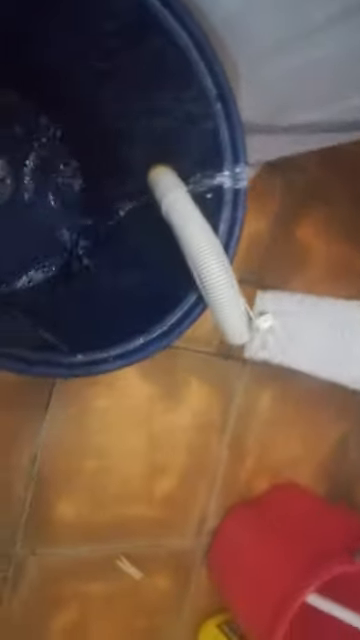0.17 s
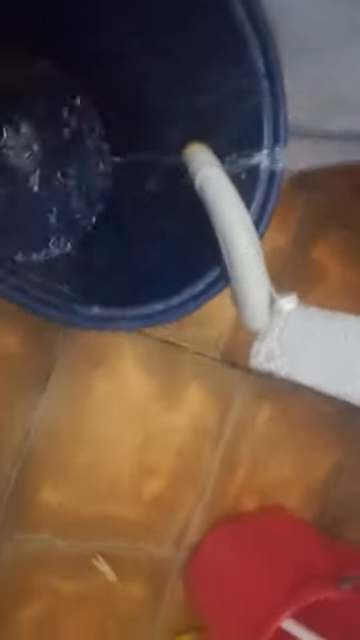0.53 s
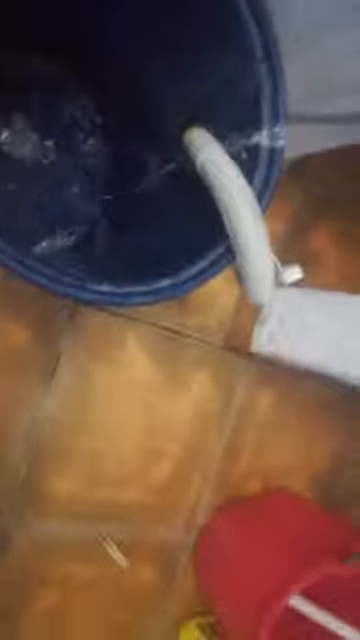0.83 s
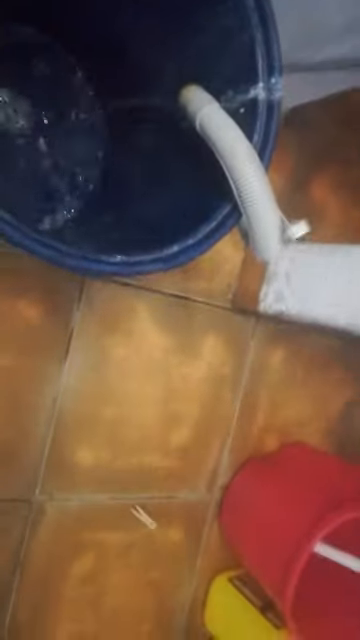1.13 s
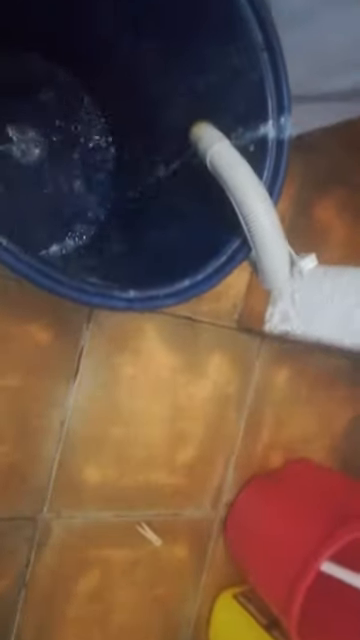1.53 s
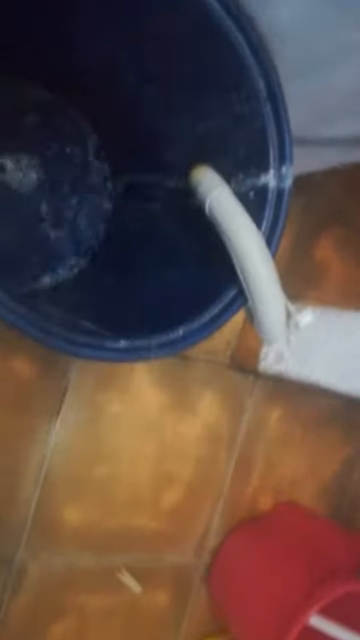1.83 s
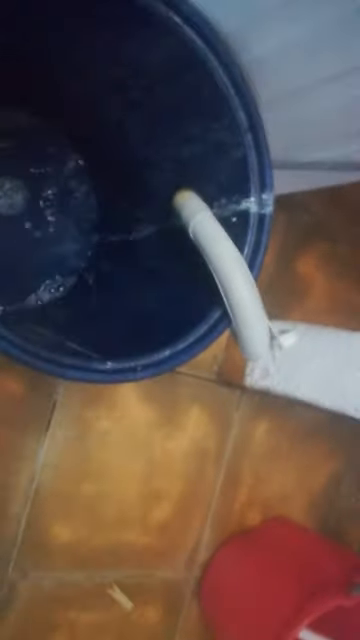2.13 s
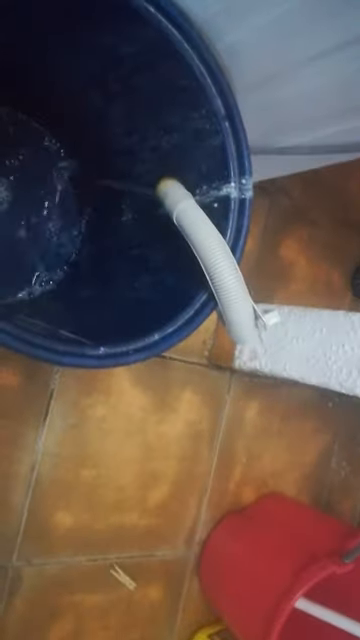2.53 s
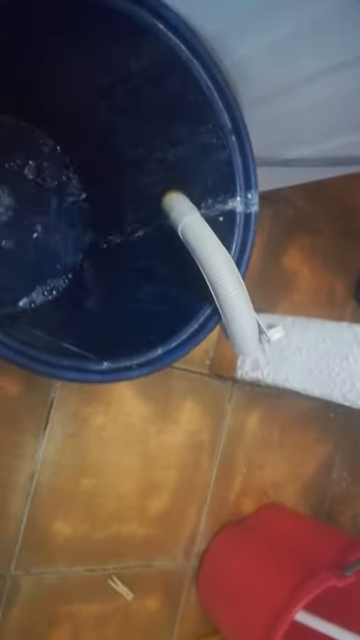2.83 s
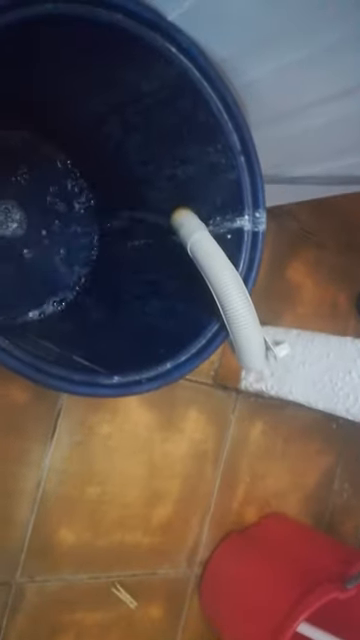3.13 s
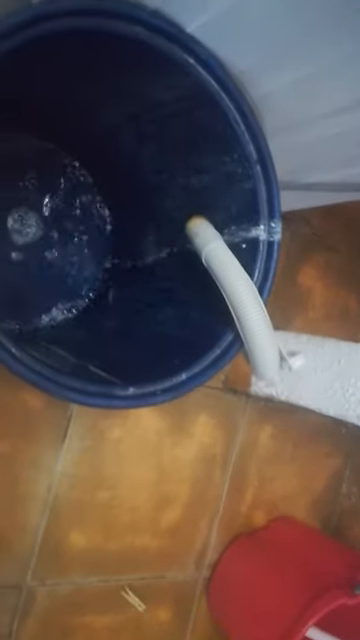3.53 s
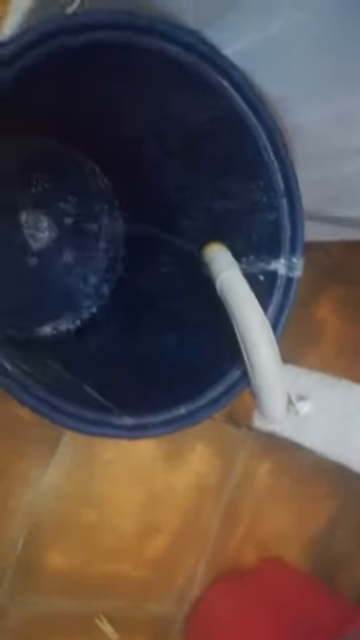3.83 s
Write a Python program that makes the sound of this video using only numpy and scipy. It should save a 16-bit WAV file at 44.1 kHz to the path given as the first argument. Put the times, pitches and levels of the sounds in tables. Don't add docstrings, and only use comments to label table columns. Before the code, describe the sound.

Water spurts from a washing machine hose into a plastic barrel about every two thirds of a second, bubbling and plopping, while a low pump hum swells with each gulp; close phone microphone, tiled room.

```python
import sys
import numpy as np
from scipy import signal
from scipy.fft import rfft, irfft
from scipy.io import wavfile

SR = 44100
rng = np.random.default_rng(int(sys.argv[2]) if len(sys.argv) > 2 else 0)


def generate_wav(signal):
    frames = np.transpose(np.atleast_2d(signal))
    scaled = np.clip(frames, -1, 1) * 32767
    pcm = np.round(scaled).astype(np.int16)
    wavfile.write(sys.argv[1], SR, pcm)


def how_loud(loudness_db):
    steps = np.asarray(loudness_db, float) / 20
    return 10 ** steps


N = 175959
T = np.arange(N) / SR


def in_time(rows):
    s, *columns = np.transpose(rows)
    return [np.interp(T, s, column) for column in columns]


def at_hz(points, hz):
    points_hz, values = np.transpose(points)
    return np.interp(np.log(hz + 1), np.log(points_hz), values)


def rms_one(x):
    return x / np.sqrt(np.mean(x ** 2) + 1e-20)


def bandpass(x, low_hz, high_hz, order=2):
    return signal.sosfilt(signal.butter(order, [low_hz, high_hz], "band", fs=SR, output="sos"), x)


def sine(hz):
    return np.sin(2 * np.pi * np.cumsum(np.broadcast_to(hz, N)) / SR)


def drift(rate_hz):
    every, settle = 40, 2000
    r = np.exp(-2 * np.pi * rate_hz * every / SR)
    noise = rng.standard_normal(N // every + settle + 2)
    slow = signal.lfilter([1], [1, -2 * r, r * r], noise)[settle:]
    return np.interp(np.arange(N) / every, np.arange(len(slow)), rms_one(slow))


def ring(clicks, hz, t60_s):
    r, w = how_loud(-60 / (t60_s * SR)), 2 * np.pi * hz / SR
    return signal.lfilter([0, np.sin(w)], [1, -2 * r * np.cos(w), r * r], clicks + 1e-18)


def banded(spectrum, patchy_db, swing_db=0, high_follows=1):
    edges = 22.6 * 2 ** np.arange(0, 9.6, .5)
    white = rng.standard_normal((2, N))
    together = drift(30)
    out, plain_power = 0, 0
    for k, (low, high) in enumerate(zip(edges, edges[1:])):
        hz = np.sqrt(low * high)
        if not spectrum[0][0] < hz < spectrum[-1][0]:
            continue
        band = how_loud(at_hz(spectrum, hz)) * bandpass(white[k % 2], low, high)
        plain_power += np.mean(band ** 2)
        follows = np.interp(np.log(hz), np.log([1000, 5000]), [1, high_follows])
        flicker_db = patchy_db * (.7 * together + drift(25))
        out = out + band * how_loud(follows * swing_db + flicker_db)
    return out / np.sqrt(plain_power)


# pitch_hz [Hz], level_db [dB per Hz]
HISS = [(290, -34), (500, -26), (659, -9), (1020, -13.5), (2890, -2.5), (14900, -18.5), (16000, -35)]


def microphone_hiss():
    near = banded(HISS, patchy_db=.4)
    far = how_loud(-6) * banded(HISS, patchy_db=.4)
    return how_loud(-65.5) * np.array([near, far])


def electronic_whine():
    whine = how_loud(-75 + 1.4 * drift(20)) * sine(14410)
    return np.array([whine, -how_loud(-5) * whine])


# start_s [s], stop_s [s], level_db [dB]
SPURTS = [
    (-.1, 0.192, -57),
    (0.607, 0.796, -56),
    (1.216, 1.481, -57.5),
    (1.956, 2.175, -55.5),
    (2.634, 2.836, -54.5),
    (3.25, 3.52, -56.5),
    (3.926, 4.193, -53.5),
]


def flow():
    dribble_db, lead_s, lead_db = -19.5, 0.16, -10.5
    land_s, fade_db, drain_s = 0.0087, -5.5, .1
    rows = []
    for start_s, stop_s, db in SPURTS:
        rows += [(start_s - lead_s, db + dribble_db),
                 (start_s - land_s, db + lead_db),
                 (start_s, db),
                 (stop_s, db + fade_db),
                 (stop_s + drain_s, db + dribble_db)]
    return in_time(rows)[0]


# pitch_hz [Hz], level_db [dB per Hz]
HOSE = [(350, 3.5), (480, -3), (610, -2.5), (850, -5.5), (2000, -13.5), (3500, -36)]


def hose_gurgle():
    return how_loud(-58.5 + 10.5 * load()[2]) * banded(HOSE, patchy_db=1.5)


def hose_mouth(excitation):
    return how_loud(-52) * ring(excitation, 820.6, t60_s=0.16)


# pitch_hz [Hz], level_db [dB per Hz]
SPLASH = [(500, -7), (900, -26), (1600, -30), (2700, 19), (4300, -6.5), (8000, -21), (16000, -48.5)]


def splash_rush(flow_db):
    swing_db = flow_db - flow_db.max()
    return how_loud(flow_db.max()) * banded(SPLASH, patchy_db=1.3, swing_db=swing_db, high_follows=0.57)


def grains(per_s, low_hz, high_hz, cycles, spread_db, vigour_db):
    sizes = how_loud(spread_db * np.minimum(rng.exponential(1, N), 3.5)) * rng.choice([-1, 1], N)
    born = rng.random(N) < per_s * how_loud(vigour_db / 2 + 4 * drift(25)) / SR
    pitches_hz = np.geomspace(low_hz, high_hz, num=16)
    dealt = rng.integers(0, 16, N)
    out = 0
    for k, hz in enumerate(pitches_hz):
        clicks = sizes * born * (dealt == k)
        softened = ring(ring(clicks, hz, cycles / hz), hz, 5 / hz)
        out = out + softened * hz ** 1.6
    return rms_one(out)


def bubble_cloud(swing_db):
    return how_loud(-46.5 + .8 * swing_db) * grains(1000, 750, 3500, 22, 4.3, swing_db)


def spray(swing_db):
    return how_loud(-67 + 0.9 * swing_db) * grains(1500, 3800, 10000, 8, 3.8, swing_db)


def drops(table, slap_db):
    gain_db, rise_per_s, swell_cycles = 10.5, 7, 3.0
    out, t = np.zeros(N + SR), np.arange(SR // 16) / SR
    for s, db, hz, cycles in table:
        swell = np.sin(np.minimum(t * hz / swell_cycles, 1) * np.pi / 2) ** 2
        tone = np.sin(2 * np.pi * hz * (t + rise_per_s * t * t / 2))
        bubble = tone * how_loud(-60 * t * hz / cycles) * swell
        burst = np.exp(-t / (.0012 + 2 / hz)) * np.minimum(t / (.0003 + 1 / hz), 1)
        slap = bandpass(rng.standard_normal(len(t)) * burst, hz / 1.8, min(hz * 1.6, 16500), order=4)
        slap = how_loud(slap_db) * slap / np.abs(slap).max()
        first = int(s * SR)
        out[first:first + len(t)] += how_loud(db + gain_db) * (bubble + slap)
    return out[:N]


# start_s [s], level_db
# [peak dB], pitch_hz [Hz]
GURGLES = [(0.564, -40, 814), (0.601, -40, 1670), (0.676, -32, 990), (0.753, -32, 1010), (0.92, -45, 1050),
           (1.23, -38, 1240), (1.256, -36, 790), (1.312, -34.5, 1140), (1.437, -54, 988),
           (1.776, -38.5, 1020), (1.863, -35, 781), (1.966, -33, 1440), (1.984, -47, 942),
           (2.054, -35, 1790), (2.113, -31, 980), (2.507, -41, 820), (2.7, -37, 1210), (2.713, -34, 795),
           (2.745, -30.5, 783), (2.932, -38.5, 1320), (3.125, -40, 977), (3.267, -49, 1460),
           (3.312, -30, 1400), (3.352, -36, 950), (3.377, -41, 820), (3.518, -38.5, 1410),
           (3.718, -33.5, 790), (3.866, -34.5, 1340),
           (0.5996, -39, 2350), (0.6405, -41, 2380), (0.7512, -33.5, 2290), (1.2057, -35.5, 2480),
         (1.3666, -35, 2450), (2.0754, -29, 2680), (2.641, -42, 3000), (2.6808, -55, 3430),
         (2.713, -40, 3600), (2.8038, -32, 2980), (2.8619, -39, 2380), (3.2533, -38, 2700),
         (3.3144, -32, 2950), (3.4443, -37, 2680), (3.5105, -35, 2680)]
# start_s [s], level_db [peak dB], pitch_hz [Hz]
FLECKS = [(0.023, -54, 5570), (0.0357, -42, 7500), (0.0957, -44, 6040), (0.188, -49, 7850),
          (0.5995, -52.5, 6300), (0.6473, -52, 8100), (0.661, -51, 5690), (0.6772, -42.5, 6170),
          (0.7332, -47, 6060), (1.174, -48.5, 5850), (1.2633, -36.5, 7800), (1.3877, -45, 5800),
          (1.4137, -55, 6020), (1.454, -48.5, 5550), (1.5062, -49.5, 5500), (1.9085, -53, 6960),
          (1.9843, -37, 5830), (2.06, -50, 5900), (2.11, -50, 7100), (2.5346, -46, 5630),
          (2.7464, -53, 5410), (2.7689, -43.5, 5670), (2.807, -54, 5560), (3.3124, -47, 8100),
          (3.3478, -50, 8140), (3.4353, -47.5, 6100), (3.463, -45, 6050), (3.7224, -47.5, 5150),
          (3.9519, -53, 6300), (3.97, -44.5, 6350)]


def small_drops():
    bubbles = [(s, db - 7, hz, 22.4) for s, db, hz in GURGLES]
    flecks = [(s, db - 9, hz, 20) for s, db, hz in FLECKS]
    return drops(bubbles, slap_db=-6.5) + drops(flecks, slap_db=3)


# start_s [s], level_db [peak dB], pitch_hz [Hz], decay_cycles [cycles]
GLUGS = [(0.096, -18.5, 1296, 2.4), (0.13, -36.5, 1050, 47), (0.257, -37.5, 696, 29),
         (0.678, -36, 475, 2.3), (0.807, -39, 760, 67), (1.389, -32.5, 487, 15), (1.703, -37, 750, 15),
         (2.11, -31, 492, 6), (2.146, -40, 760, 13), (2.159, -35.5, 823, 28), (2.698, -30, 475, 11),
         (2.745, -29.5, 475, 11), (3.691, -24, 940, 4.3), (3.971, -49, 1070, 13)]
# start_s [s], level_db [peak dB], pitch_hz [Hz], decay_cycles [cycles]
PLOPS = [(0.0641, -41, 2040, 54), (0.0807, -36.5, 2980, 40), (0.0978, -26, 2700, 22),
         (0.189, -34, 1610, 16.4), (0.3898, -42.5, 2680, 20), (0.643, -35.5, 1550, 24),
         (1.2141, -28, 2760, 6.7), (1.2968, -31, 2220, 6), (1.3552, -28, 1840, 9.5),
         (1.381, -30.5, 2424, 41), (1.484, -50, 1270, 5.7), (1.944, -29, 2280, 28), (2.087, -31, 2730, 32),
         (2.1714, -42, 2730, 65), (2.632, -29.5, 1140, 11), (2.76, -23, 2155, 18.5),
         (2.9118, -32.5, 1410, 11.5), (3.256, -29.5, 1460, 8.5), (3.3767, -32, 2880, 14),
         (3.4594, -30, 2700, 34), (3.9699, -40, 1080, 36)]
# start_s [s], level_db [peak dB], pitch_hz [Hz], decay_cycles [cycles]
DROPS = [(0.317, -45, 4700, 24), (0.6769, -30.5, 2760, 16), (0.7537, -36, 4780, 22),
         (0.7713, -43.5, 5900, 31), (1.0058, -36.5, 3700, 20), (1.1421, -45.5, 4480, 57),
         (1.2588, -33, 3830, 19), (1.485, -31, 4100, 7.2), (1.9597, -29.5, 3760, 16),
         (1.9848, -36.5, 5780, 17), (2.373, -40, 4470, 65), (3.053, -42.5, 4530, 8.5),
         (3.308, -46, 4230, 13), (3.9689, -39.5, 4640, 11)]
# start_s [s], level_db [peak dB], pitch_hz [Hz]
TICKS = [
    (0.0014, -41, 8950),
    (1.267, -48, 13900),
    (1.3133, -42.5, 8100),
    (1.548, -51.5, 11800),
    (1.983, -63, 8400),
    (2.5346, -38.5, 13200),
    (3.3064, -48, 8100),
    (3.865, -48, 8000),
]


def large_drops():
    ticks = [(s, db, hz, 26) for s, db, hz in TICKS]
    return drops(GLUGS + PLOPS + DROPS + ticks, slap_db=-12)


def barrel(x):
    t60_s, cut_hz = 0.23, 8800
    dull = np.exp(-2 * np.pi * cut_hz / SR)
    z = np.exp(-2j * np.pi * np.arange(N // 2 + 1) / N)
    lags_s = np.geomspace(.006, .023, num=8) * rng.uniform(.95, 1.05, size=8)
    echoes = 0
    for k, lag_s in enumerate(lags_s):
        loop = how_loud(-60 * lag_s / t60_s) * (1 - dull) / (1 - dull * z) * z ** np.round(lag_s * SR)
        echoes = echoes + (-1) ** k * loop / (1 - loop)
    return how_loud(-17.5) * irfft(rfft(x) * echoes, N)


def water():
    flow_db = flow()
    swing_db = flow_db - flow_db.max()
    stream = hose_gurgle() + splash_rush(flow_db)
    bubbles = bubble_cloud(swing_db)
    stream += hose_mouth(stream + bubbles)
    hits = bubbles + spray(swing_db) + large_drops() + small_drops()
    return stream + hits + barrel(hits)


def cabinet_bump():
    return how_loud(-28) * np.exp(-((T - 1.035) / .045) ** 2) * np.sin(2 * np.pi * 84 * T)


# pitch_hz [Hz], level_db [dB per Hz]
RUMBLE = [(15, -46), (25, -6), (48, -25), (81, -2.5), (145, -1.5), (169, -30), (194, -8.5), (257, -10.5),
          (700, -25.5), (910, -62), (1540, -120)]


def rumble(share):
    return how_loud(-49.5 + 5 * share) * banded(RUMBLE, patchy_db=0.36)


# harmonic [multiple of mains], level_db [dB], load_gain_db [dB], wobble_db [dB]
HUM = [
    (1, -52.5, 6, 3),
    (2, -46.5, 1, 5),
    (4, -56.5, 4.5, 7),
    (5, -57.5, 3.5, 4),
    (6, -51.5, -1, 1.5),
    (7, -62.5, 1, 4.5),
    (8, -64.5, -27, -10),
    (9, -69, 15.5, 1.5),
]
# start_s [s], level_db [dB]
PANEL_BUZZ = [
    (0, 2),
    (1.2, -0.5),
    (1.5, -13),
    (4, -4),
]


def motor_hum(share):
    mains_hz, dip_depth_db, dip_s, early_s = 50.2, -15, .075, .03
    dip_db = dip_depth_db * sum(np.exp(-((T - full + early_s) / dip_s) ** 2) for _, full, *_ in GULPS)
    panel_db = in_time(PANEL_BUZZ)[0]
    out = np.zeros(N)
    for k, db, load_db, wobble_db in HUM:
        level_db = db + load_db * share + min(wobble_db, .6 * k + .3) * drift(10)
        level_db += panel_db * (k == 6) + dip_db * (k == 1)
        phase = .08 * (k + 1) * drift(5) + rng.uniform(0, 7)
        out += np.sqrt(2) * how_loud(level_db) * np.sin(2 * np.pi * k * mains_hz * T + phase)
    return out


def priming_churn():
    centre_hz, width_hz, spread_s = 216.3, 50, 0.071
    noise = bandpass(rng.standard_normal(N), centre_hz - width_hz / 2, centre_hz + width_hz / 2)
    swell = sum(np.exp(-((T - full) / spread_s) ** 2) for _, full, *_ in GULPS)
    return how_loud(-43) * rms_one(noise) * swell


# dry_s [s], full_s [s], full_level_db [blade tone dB when fully loaded],
# last_level_db [blade tone dB before it runs dry again]
GULPS = [
    (-.45, -0.04, -35, -32),
    (0.241, 0.539, -32, -31.5),
    (0.893, 1.188, -33.5, -34.5),
    (1.564, 1.851, -31.5, -32.5),
    (2.244, 2.603, -34, -31),
    (2.904, 3.205, -31.5, -33),
    (3.584, 3.831, -32.5, -32),
    (4.3, 4.5, -31, -31),
]


def load():
    dry_db, primed_db, prime_s, lose_s = -19, -13.5, 0.0833, 0.0718
    stall_hz, surge_hz, sag_hz = -11, 2.348, -2.43
    rows = []
    for (dry_s, full_s, db, last_db), (end_s, *_) in zip(GULPS, GULPS[1:]):
        rows += [(dry_s, db + dry_db, stall_hz, 0),
                 (dry_s + prime_s, db + primed_db, 0, .1),
                 (full_s, db, surge_hz, 1),
                 (end_s - lose_s, last_db, sag_hz, 1)]
    return in_time(rows)


def blade_tone(blade_db, bend_hz):
    return np.sqrt(2) * how_loud(blade_db + 1.1 * drift(8)) * sine(150.15 + bend_hz + drift(6))


def pump():
    blade_db, bend_hz, share = load()
    body = cabinet_bump() + rumble(share) + motor_hum(share)
    return body + priming_churn() + blade_tone(blade_db, bend_hz)


# [near over far, dB]
FAR_PORT = [(60, -.5), (130, -1.2), (290, -.3), (640, 8), (1300, 13.5), (3100, 11.5), (6820, 9), (15000, 6)]
# pitch_hz [Hz], shared [share heard alike, 0-1]
SHARED = [(60, 1.0), (450, 1), (1000, 1), (2000, 0.87), (4000, 0.49), (15000, 0.12)]


def far_port(near):
    lag_s = 0.00072
    hz = np.arange(N // 2 + 1) * SR / N
    shared = np.clip(at_hz(SHARED, hz), 0, 1)
    turns = np.interp(hz, np.arange(0, SR / 2, 50), np.cumsum(rng.random(SR // 100)))
    scattered = np.exp(-2j * np.pi * turns)
    direct = np.exp(-2j * np.pi * hz * lag_s)
    path = shared * direct + np.sqrt(1 - shared ** 2) * scattered
    return irfft(rfft(near) * how_loud(-at_hz(FAR_PORT, hz)) * path, N)


def scene():
    near = water() + pump()
    return np.array([near, far_port(near)]) + electronic_whine() + microphone_hiss()


def band_limit(x):
    return signal.sosfilt(signal.butter(12, 16650, fs=SR, output="sos"), x)


def record(dry):
    x = signal.sosfilt(signal.butter(3, 44, "high", fs=SR, output="sos"), dry)
    x = signal.sosfilt(signal.cheby2(30, 60, 15950, fs=SR, output="sos"), x)
    return band_limit(x)


dry = scene()
out = record(dry)
generate_wav(out)
```